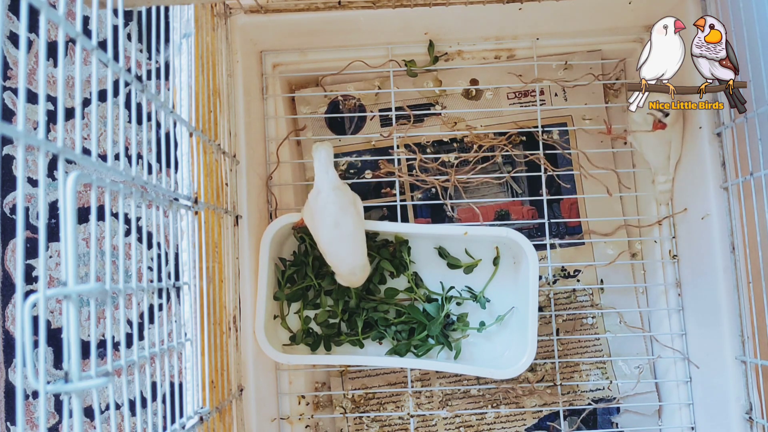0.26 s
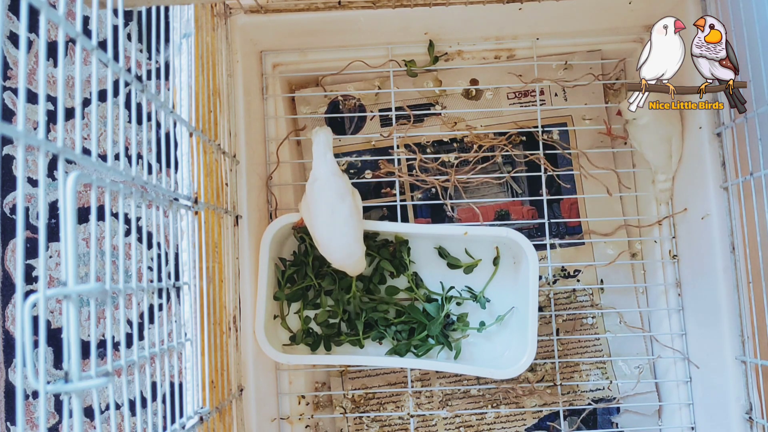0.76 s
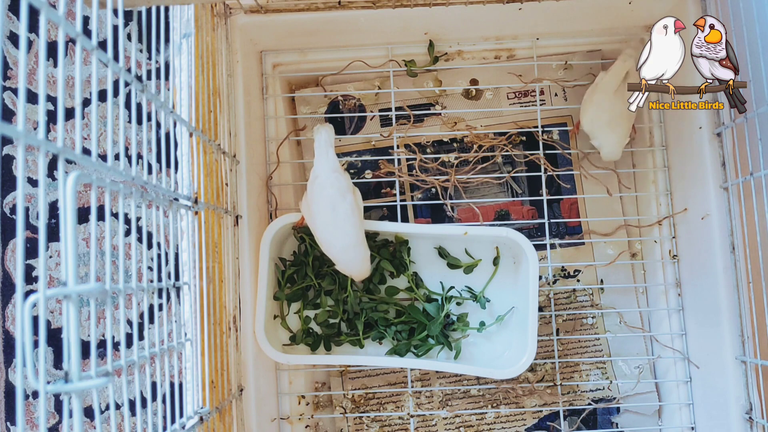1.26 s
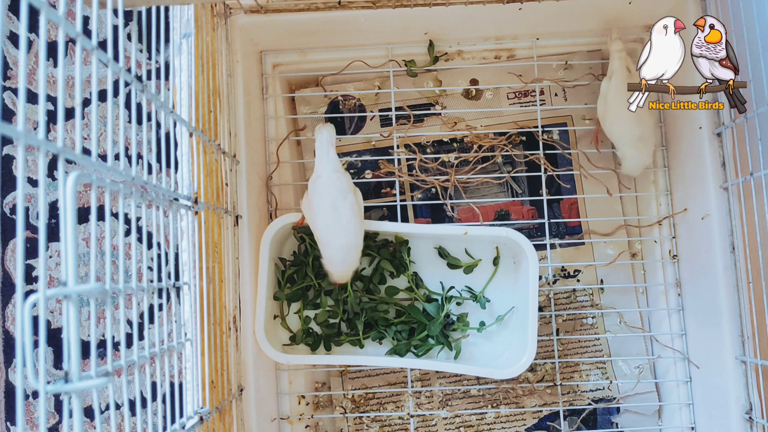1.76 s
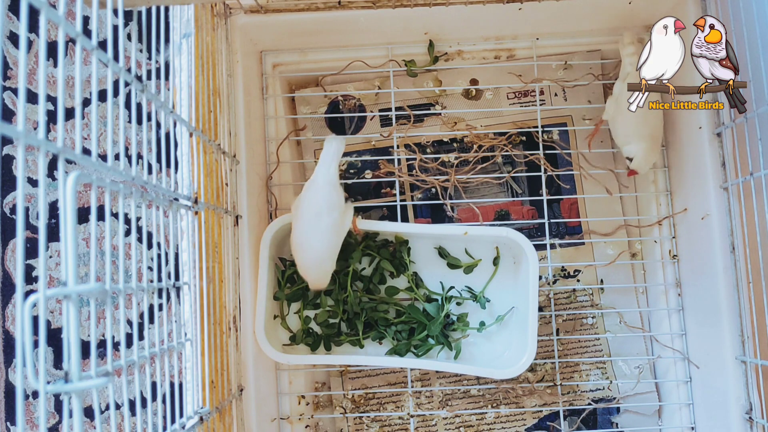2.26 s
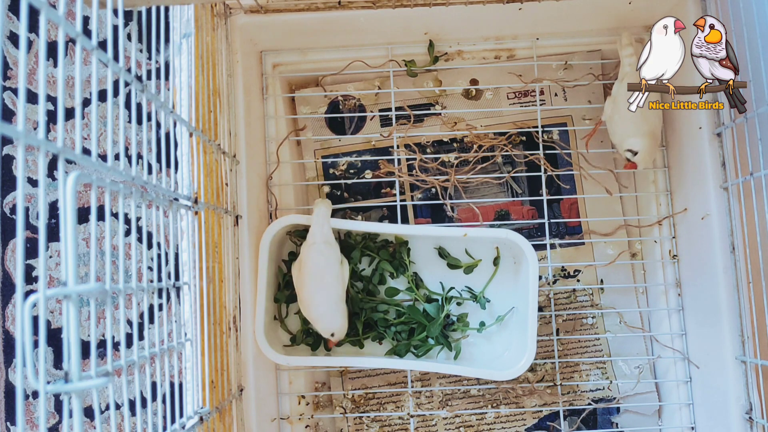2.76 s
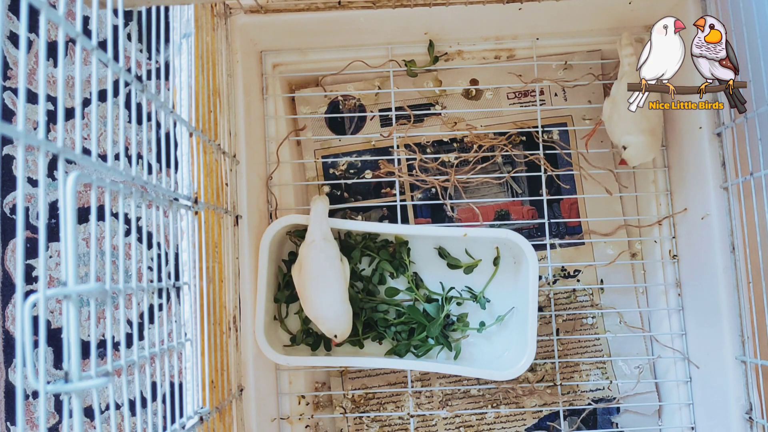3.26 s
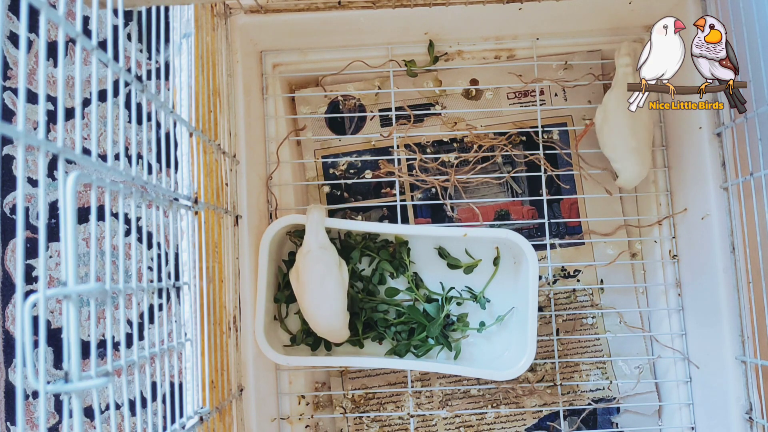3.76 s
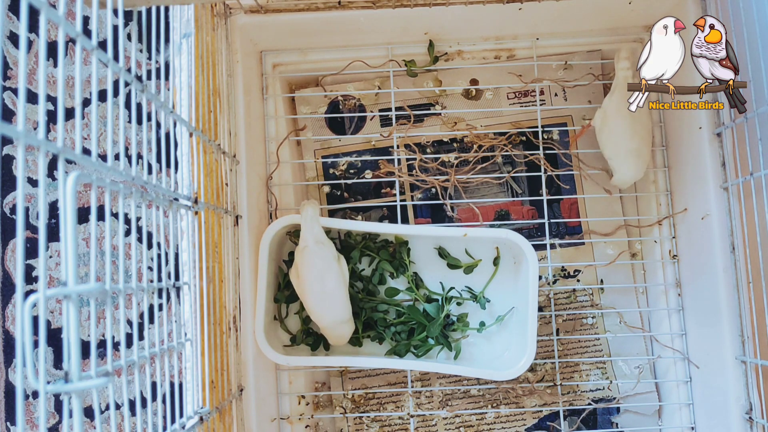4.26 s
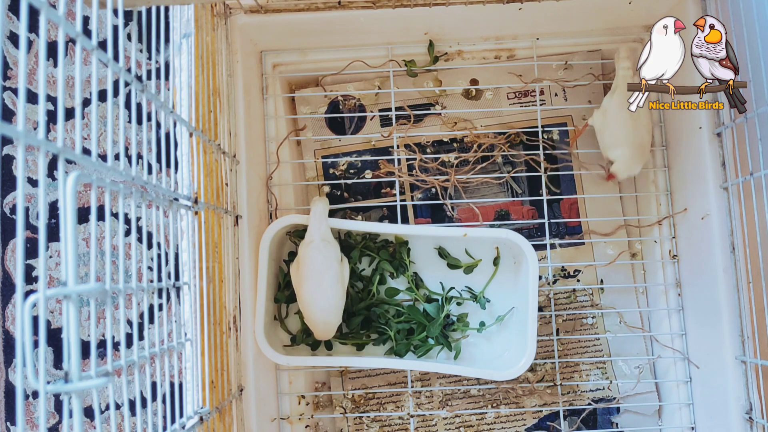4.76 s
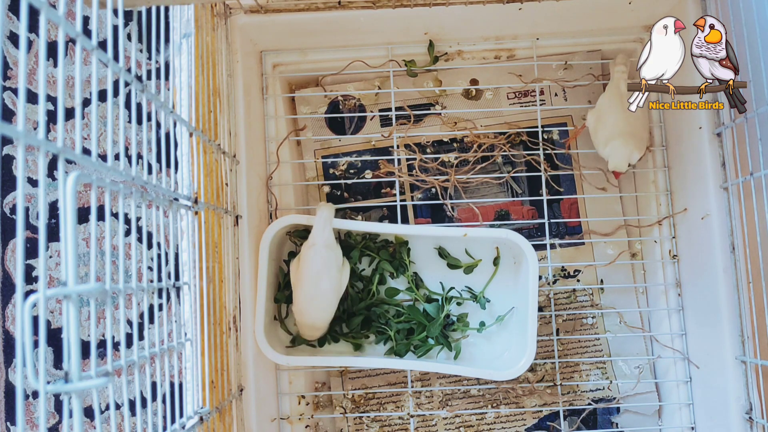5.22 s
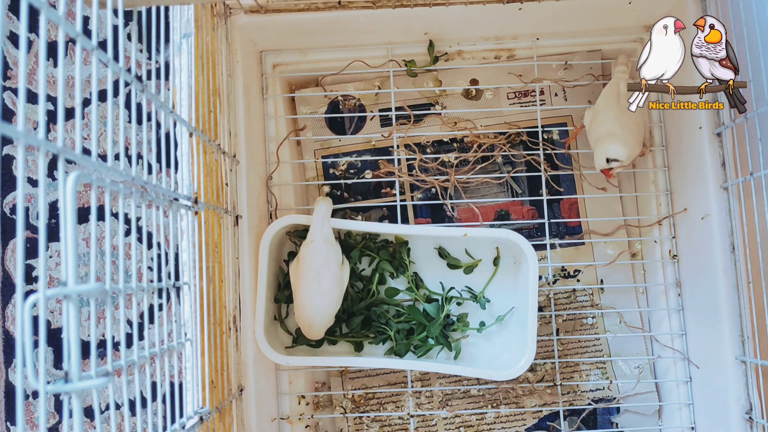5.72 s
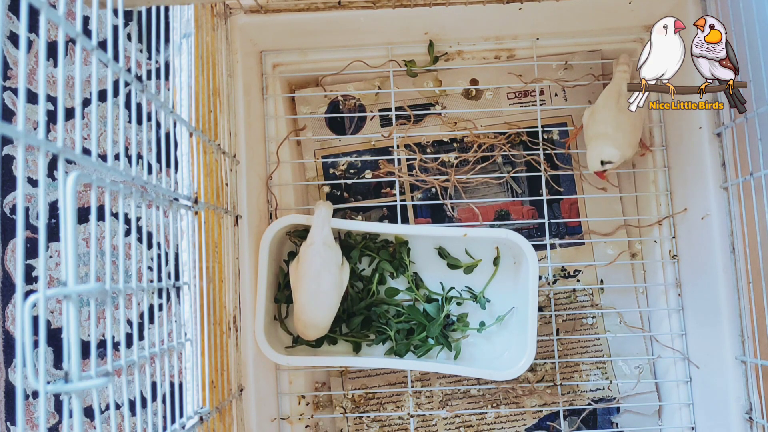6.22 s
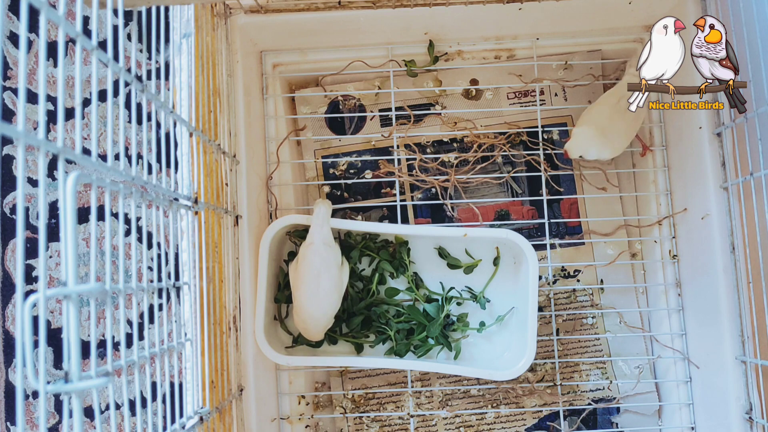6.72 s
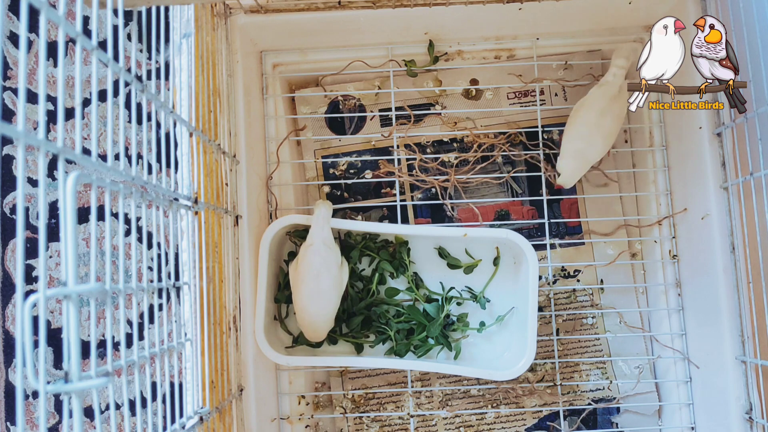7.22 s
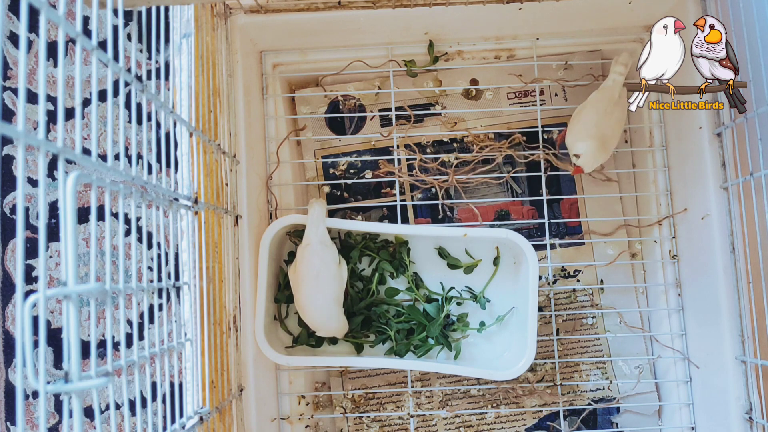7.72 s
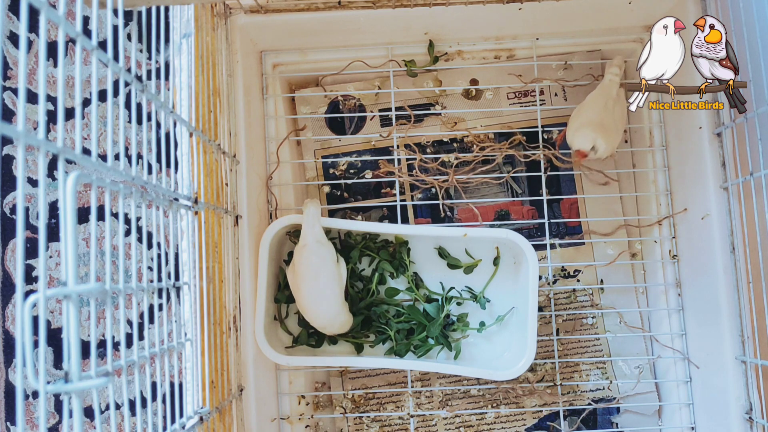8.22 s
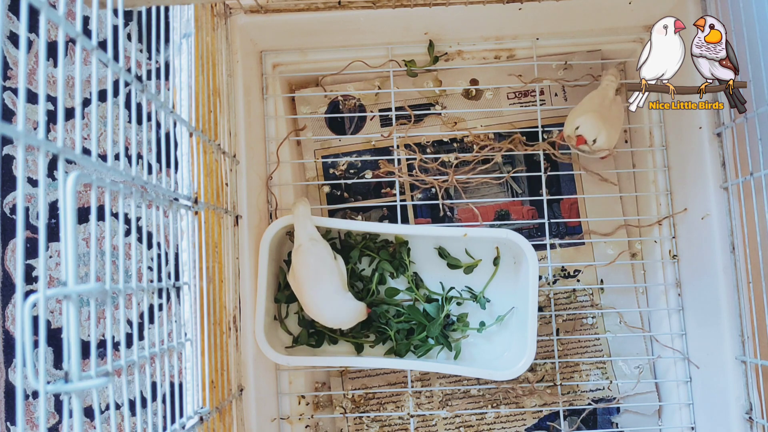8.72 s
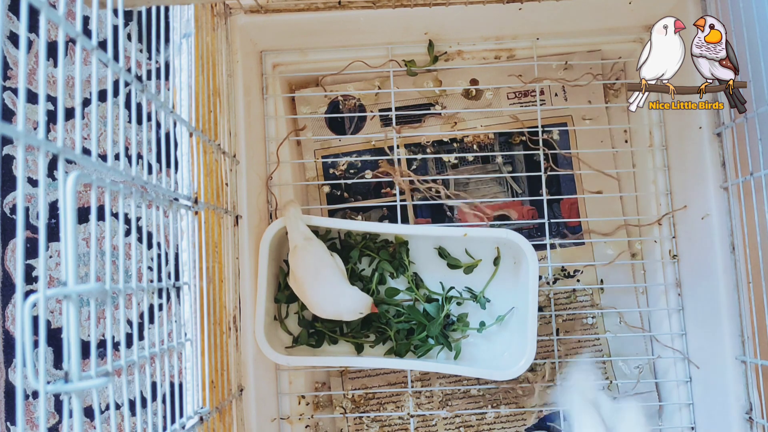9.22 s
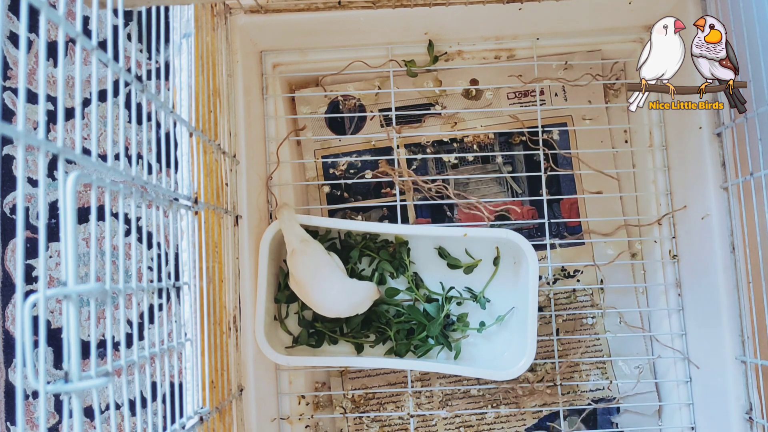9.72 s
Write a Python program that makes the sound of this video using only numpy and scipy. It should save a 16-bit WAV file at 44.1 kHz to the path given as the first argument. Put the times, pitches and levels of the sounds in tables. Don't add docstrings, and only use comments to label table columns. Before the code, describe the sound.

Finches heard close in an indoor wire cage: short buzzy song and paired thin whistles, a soft flutter, then sparse feet, beak knocks on plastic, light claw scrapes and humming wires. Bright piercing chirps cut through in a pair, later a trio. In the last two seconds quick buzzes, whistles and nasal toots overlap with strong wing puffs and snapping bars. Faint hiss and rumble, short reverberation, image leaning left.

```python
import sys
import numpy as np
from scipy import signal
from scipy.fft import rfft, irfft
from scipy.io import wavfile
from scipy.ndimage import uniform_filter1d

SR = 44100
rng = np.random.default_rng(int(sys.argv[2]) if len(sys.argv) > 2 else 0)


def gain_from_db(level_db):
    decades = np.asarray(level_db, float) / 20
    return 10 ** decades


def bounce(signal):
    frames = np.transpose(np.atleast_2d(signal))
    limited = np.clip(frames, -1, 1)
    pcm = np.round(limited * 32767).astype(np.int16)
    wavfile.write(sys.argv[1], SR, pcm)


N = 440109

# (frequency [Hz], density [dB per Hz])
AIR = [(12, -36), (20, 5.5), (32, -6), (146, -16.5), (172, -13.5), (198, -22.5), (319, -13.5), (367, -15),
       (558, -16.5), (642, -20), (718, -18.5), (1190, -26.5), (1530, -29), (9140, -39), (16000, -32)]
AIR_DB = -48.5
# (frequency [Hz], rms level [dB])
HUM = [(100, -61), (145, -62.5), (199, -61.5)]
# (frequency [Hz], left-right likeness [-1 to 1])
LIKENESS = [(60, -0.085), (240, 0.93), (950, -0.032), (3770, 0.15), (15000, -1.2)]
# (frequency [Hz], t60 [s])
ROOM_T60 = [(200, 1), (1500, 0.61), (4000, 0.34), (6500, 0.33), (8700, 0.34), (11000, 0.24), (15000, 0.085)]
# (delay [s], level [dB], sign always positive)
WALLS = [(.0031, 6.5), (.0058, -6.5), (.0094, -13.5), (0.014, 4), (0.022, -23)]
# (frequency [Hz], level [dB])
PORTS = [(60, 6), (180, 8), (550, 5), (1650, 6.5), (4970, 6), (15000, 11)]
# (frequency [Hz], gain [dB])
MICROPHONE = [(20, 5), (7000, 1.5), (8700, 3), (10300, -6), (12000, -4), (15000, -0.5)]
EDGE_HZ = 15850

# (time [s], effort [dB], pitch [Hz], roughness [0-1])
OPEN_BUZZES = [
    (-.06, -31.5, 1092, 0.84),
    (.739, -33, 1080, 0.3),
    (8.436, -32.5, 1080, 0.3),
    (9.403, -32.5, 1078, 0.3),
]
DRAWLS = [
    (0.207, -43, 900, 1.1),
    (1.078, -44.5, 900, 0.83),
    (8.734, -45, 900, 1.1),
    (9.689, -45, 900, 1.2),
]
SLIDES = [
    (0.349, -39.5, 1360, 0.16),
    (8.865, -38.5, 1296, 0.67),
]
BUZZES = [
    (0.568, -34, 1186, 1),
    (8.233, -33, 1133, 0.6),
    (9.084, -40.5, 1166, 0.47),
]
MUTTERS = [
    (5.04, -46, 581, 1),
    (7.858, -48, 848, 1),
]
OPEN_BUZZ, DRAWL, SLIDE = (0.047, 0.048), (0.027, 0.16), (0.0035, 0.03)
BUZZ, MUTTER = (0.038, 0.058), (0.021, 0.025)
# (frequency [Hz], gain [dB])
BUZZ_THROAT = [(500, -17.5), (1100, -8.5), (2200, -6.5), (3400, 1), (4500, 0.5), (5700, -2.5),
               (7200, -11.5), (8800, -13), (11000, -23), (15500, -23)]
# (frequency [Hz], gain [dB])
OPEN_THROAT = [(500, -8), (1100, -14), (2150, -5.5), (3250, -3.5), (4300, -1.5), (5400, 0.5), (7200, -15.5),
               (8700, -11.5), (11000, -20), (15500, -21)]
BUZZ_SWELL_DB, BUZZ_SWELL_S = -7, 0.011
BUZZ_SINK_DB, LOW_SINK_DB = -7.5, -9

# (time [s], peak level [dB], pitch [Hz], length [s])
WHISTLES = [
    (0.103, -33, 4010, 0.03),
    (0.165, -26.5, 5260, 0.023),
    (0.972, -33, 4034, 0.035),
    (1.036, -24.5, 5210, 0.023),
    (8.617, -29.5, 4080, 0.011),
    (8.676, -22, 5113, 0.014),
    (9.582, -31, 3976, 0.024),
    (9.649, -21.5, 5138, 0.015),
]
FLICK_FROM_HZ, FLICK_SHARE, FLICK_BEND = 3600, 1, 2.4

# (time [s], effort [dB], top pitch [Hz], length [s], tilt as the beak opens [dB per octave])
STACKS = [
    (0.444, -51.5, 521, 0.086, 3),
    (8.076, -46, 633, 0.1, 0),
    (8.649, -45.5, 615.4, 0.084, -3.5),
    (8.959, -50.5, 512.4, 0.097, 1),
    (9.051, -46, 590, 0.031, -3.5),
    (9.279, -44.5, 624, 0.092, 1.1),
    (9.569, -47, 546, 0.037, -5),
]
# (frequency [Hz], gain [dB])
STACK_THROAT = [(550, -20.5), (1200, -2), (1800, -2), (2500, 0.5), (4300, 1.5), (5600, -7), (7000, -14),
                (8800, -12.5), (10000, -26), (12000, -23)]
STACK_SAG, SAG_PER_DB = 0.088, -0.028
BREATH, BREATH_PER_DB = 0.29, 0.4

# (time [s], length [s], rustle [dB], thrown air [dB], body of the beat [dB])
WINGS = [(1.105, 0.24, -47.5, -47.5, -46), (1.172, 0.31, -54.5, -46.5, -46), (1.46, 0.28, -73, -47, -55),
         (5.039, 0.029, -43.5, -53, -66), (7.08, 0.055, -48, -70.5, -52), (7.204, 0.16, -64.5, -71, -51.5),
         (9.07, 0.12, -40, -54, -44), (9.115, 0.21, -54, -36, -45), (9.261, 0.062, -48, -59, -47.5),
         (9.694, 0.32, -54, -44.5, -58), (9.829, 0.1, -47, -47, -44.5), (9.892, 0.102, -68, -35, -44.5)]
# (frequency [Hz], density [dB per Hz])
FEATHER = [(590, -51), (1000, -4.5), (2360, -7), (2560, -5), (3270, -6), (5020, -3.5), (5440, -1),
           (10800, -18), (16000, -21)]
SPREAD, FOLD_DB = 0.1, -25.5
BEATS_PER_S, BEAT_DB = 22, 1

# (time [s], peak level [dB], ring [Hz], brightness [dB])
THUDS = [(1.143, -39, 780, -5), (1.808, -49, 1050, 12), (1.81, -40.5, 524, -20), (1.898, -41.5, 1070, 11),
         (2.053, -41, 900, -23), (3.694, -41.5, 1410, -28), (4.74, -40.5, 783, -20),
         (6.946, -43.5, 960, 17), (7.079, -34, 840, -9), (7.223, -52.5, 720, -20), (7.283, -53.5, 815, -10),
         (7.86, -48, 1003, -21)]
THUD_SHARP, THUD_T60_S = 0.32, 0.095
# (time [s], peak level [dB], ring [Hz], brightness [dB], sharpness [0-1])
KNOCKS = [(2.41, -29, 1075, -42, 0.7), (2.423, -37, 1150, -31.5, 0.7), (2.427, -33, 1180, -24, 0.33),
          (2.439, -33, 710, -26.5, 0.33), (2.606, -39, 920, -48, 0.84), (2.613, -33, 1076, -39, 0.7),
          (2.617, -35, 1150, -25, 0.6), (4.246, -52, 1123, -21.5, 0.6), (4.394, -47.5, 900, -27, 0.44),
          (4.432, -50, 1030, -25, 0.5), (5.226, -48.5, 1550, -16, 0.14), (5.273, -58, 825, -14, 1),
          (5.299, -44, 824, -30.5, 0.27), (9.866, -38, 1580, -15, 0.73), (9.879, -26.5, 710, -11, 0.15)]
KNOCK_T60_S = 0.031

# (time [s], peak level [dB], ring [Hz], top ring [dB])
TICKS = [(1.471, -61, 5380, 13), (1.624, -47.5, 3160, -4), (1.898, -41, 4120, -49), (2.438, -43, 2280, -31),
         (2.6917, -34.5, 2960, -21), (2.728, -48.5, 2760, 4.5), (2.855, -45.5, 3070, -29),
         (3.821, -39, 2850, -8), (3.9969, -38, 3070, -6), (4.3792, -64, 2760, 9), (4.741, -40, 3720, -24),
         (4.8418, -56, 2400, -4), (5.1632, -58, 3340, 16.5), (5.3191, -58, 2260, 8.5),
         (5.369, -59, 2560, 14.5), (5.9304, -58, 3660, 9.5), (6.1646, -36, 2900, -20),
         (6.399, -58, 5260, -21), (6.4825, -42.5, 3050, -15), (7.337, -34, 2860, -11.5),
         (7.3834, -42.5, 3200, -5), (7.529, -53.5, 2450, -10.5), (7.564, -37, 2620, -2),
         (7.6412, -63, 2350, -9.5)]
# (time [s], peak level [dB], ring [Hz], top ring [dB])
SCRAPES = [
    (2.1603, -40.5, 2300, -22),
    (5.012, -36, 3050, -12),
    (7.85, -38.5, 2910, -5.5),
]
# (time [s], peak level [dB], ring [Hz], top ring [dB])
SNAPS = [
    (9.0676, -27, 5060, 3),
    (9.155, -32, 3340, -1),
    (9.218, -27.5, 3300, -6),
    (9.868, -25, 2290, 13),
    (9.882, -28, 5100, 0),
]
TICK_T60_S, SCRAPE_T60_S, SNAP_T60_S = 0.038, 0.19, 0.007
# (time [s], level [dB], frequency [Hz], t60 [s])
WIRES = [(3.699, -48, 1800, 0.27), (3.698, -46, 1547, 0.15), (3.7, -48, 1660, .2), (3.7, -52, 500, 0.24),
         (4.746, -48, 554, 0.22), (4.751, -47, 345, 0.1), (4.744, -50, 1330, 0.2), (4.752, -48, 1060, 0.08),
         (7.079, -38, 1313, 0.12), (7.389, -55, 3220, 0.2), (9.086, -37, 2045, 0.6), (1.9, -54, 1880, .35),
         (1.899, -52, 4350, .08), (2.172, -51, 1850, .06), (5.3, -54, 1600, .15)]

# (time [s], peak effort [dB], length [s], upper voice knee [Hz], lower voice top [Hz])
CHIRPS = [
    (3.137, -18.5, 0.081, 5130, 4080),
    (3.285, -12.5, 0.056, 5287, 4060),
    (6.696, -16.5, 0.078, 4966, 4100),
    (6.827, -14, 0.069, 5034, 4094),
    (6.96, -15, 0.075, 4723, 3956),
]
# (multiples of upper and lower voice, level [dB])
MIXES = [
    ("1 0", 0),
    ("0 1", -13.5),
    ("0 2", -25),
    ("2 -1", -25),
    ("1 1", -30.5),
    ("2 0", -15),
    ("1 -1", -52),
]
# (frequency [Hz], gain [dB])
CHIRP_BEAK = [(2500, -4), (3200, 0), (3450, -1.5), (3750, -2), (4400, -6), (5200, -7), (5700, -1.5),
              (6600, 3), (7600, 0), (9500, -1.5), (12000, 0)]
SCOOP_HZ, SCOOP_S, CLIMB_HZ_PER_S = 1417, 0.0085, 20000
LOW_START, LOW_SCOOP_HZ, LOW_SAG, LOW_FADE_DB = 0.73, 346, 0.035, -15.5
TURN, CATCH_AT = 0.81, 0.87
SWELL_DB, SWELL_S, CATCH_DB, CATCH_S, CLOSE_DB = -26.5, 0.021, -14, 0.006, -3.5


def evened(x):
    return x / np.sqrt(np.mean(x ** 2) + 1e-20)


def read(points, hz):
    f, value = np.transpose(points)
    return np.interp(np.log(hz + 1), np.log(f + 1), value)


def add(mix, s, sound):
    at = round(s * SR)
    part = mix[max(at, 0):][:len(sound) + min(at, 0)]
    part += sound[max(-at, 0):][:len(part)]


def chance(size):
    return rng.standard_normal(max(size, 30000))[:size]


def wobble(size, hz):
    width = int(SR / hz)
    return evened(uniform_filter1d(uniform_filter1d(chance(size), width), width))


def coloured(x, points):
    hz = np.fft.rfftfreq(x.shape[-1], 1 / SR)
    return irfft(rfft(x) * gain_from_db(read(points, hz)), x.shape[-1])


def ring(hz, width_hz, noise):
    r = np.exp(-np.pi * width_hz / SR)
    poles = [1, -2 * r * np.cos(2 * np.pi * hz / SR), r * r]
    return evened(signal.lfilter([1, 0, -1], poles, noise))


def harmonics(hz, throat, uneven_db, count):
    turns = np.cumsum(hz) / SR
    k = np.arange(1, count)[:, None]
    gain_db = read(throat, k * hz) + uneven_db * rng.standard_normal(k.shape)
    gain = gain_from_db(gain_db) * (k * hz < EDGE_HZ)
    phase = k * turns + rng.random(k.shape)
    return evened((gain * np.cos(2 * np.pi * phase)).sum(0))


def air():
    frames, hz = N // 512 + 5, np.fft.rfftfreq(2048, 1 / SR)
    a, b, c, d, patches = rng.standard_normal((frames, 1025, 5)).T
    patches = evened(uniform_filter1d(uniform_filter1d(patches, 30, 0), 8, 1))
    same = np.clip(read(LIKENESS, hz), -1, 1)[:, None]
    left = a + 1j * b
    right = same * left + np.sqrt(1 - same ** 2) * (c + 1j * d)
    z = np.array([left, right]) * gain_from_db(read(AIR, hz)[:, None] + 0.86 * patches)
    hiss = gain_from_db(AIR_DB) * evened(signal.istft(z, nperseg=2048, noverlap=1536)[1][:, :N])
    return hiss + sum(gain_from_db(db) * ring(f, 7.4, rng.standard_normal(N)) for f, db in HUM)


def room():
    taps = np.zeros((2, SR))
    slots = np.arange(300, SR - 20, 12)
    at = slots + rng.integers(0, 12, (2, len(slots)))
    np.put_along_axis(taps, at, rng.choice([-1., 1.], at.shape), 1)
    hz, t, z = signal.stft(taps, SR, nperseg=256)
    decay = gain_from_db(-60 * t / read(ROOM_T60, hz)[:, None])
    tail = signal.istft(z * decay, SR, nperseg=256)[1]
    tail = gain_from_db(8.0) * tail / np.linalg.norm(tail[0])
    for s, db in WALLS:
        tail[[0, 1], round(s * SR) + rng.integers(0, 30, 2)] += gain_from_db(db)
    return tail


def buzz(s, effort_db, hz, hold_s, fall_s, rough, throat):
    t = np.arange(0, hold_s + fall_s, 1 / SR)
    down = np.clip((t - hold_s) / fall_s, 0, 1)
    start = np.exp(-(t / BUZZ_SWELL_S) ** 2)
    pitch = hz * (1 - 0.0926 * np.exp(-t / 0.00613)) * (1 - 0.5 * down ** 0.8)
    pitch = pitch * (1 + (0.0099 + 0.0063 * rough * down) * wobble(len(t), hz=493))
    breath = evened(coloured(chance(len(t)), throat))
    share = np.clip(rough * (0.35 + 0.5 * down + start), 0, 1)
    voice = (1 - share) * harmonics(pitch, throat, uneven_db=-0.5, count=28) + share * breath
    low = coloured(voice, [(2500, 0), (3100, -40)])
    voice = voice - low * (1 - gain_from_db(LOW_SINK_DB * np.minimum(4 * down, 1)))
    effort = gain_from_db(effort_db + BUZZ_SINK_DB * down + BUZZ_SWELL_DB * start)
    return s, effort * voice * (1 - np.exp(-t / 0.00045)) * signal.windows.tukey(len(t), 0.12)


def whistle(s, db, hz, length_s):
    t = np.arange(0, length_s, 1 / SR)
    closing = (t / length_s) ** FLICK_BEND
    pitch = hz * (1 + 0.078 * np.exp(-t / 0.0034)) + FLICK_SHARE * (hz - FLICK_FROM_HZ) * closing
    phase = 2 * np.pi * np.cumsum(pitch) / SR
    breath = evened(coloured(chance(len(t)), BUZZ_THROAT))
    tone = gain_from_db(-22 * closing) * (np.sin(phase) + 0.041 * np.sin(2 * phase)) + 0.045 * breath
    return s, gain_from_db(db) * tone * signal.windows.tukey(len(t), 0.2)


def stack(s, effort_db, hz, length_s, tilt_db):
    t = np.arange(0, length_s, 1 / SR)
    throat = [(f, db + tilt_db * np.log2(f / 2000)) for f, db in STACK_THROAT]
    sag = (STACK_SAG + SAG_PER_DB * tilt_db) * (t / length_s) ** 3.65
    pitch = hz * (1 - 0.0963 * np.exp(-t / 0.01625) - sag)
    pitch = pitch * (1 + 0.0065 * wobble(len(t), hz=302))
    voice = harmonics(pitch, throat, uneven_db=1.5, count=20)
    breath = evened(coloured(chance(len(t)), throat))
    voice = voice + max(BREATH + BREATH_PER_DB * tilt_db, 0) * breath
    return s, gain_from_db(effort_db) * voice * signal.windows.tukey(len(t), 0.45)


def wings():
    rustle, gust = np.zeros(N), np.zeros((2, N))
    for s, length_s, rustle_db, air_db, body_db in WINGS:
        t = np.arange(0, length_s, 1 / SR)
        u, size = t / length_s, len(t)
        fade = np.minimum(u / SPREAD, 1) * np.minimum((1 - u) / 0.095, 1)
        fade = fade * gain_from_db(FOLD_DB * np.maximum(u - SPREAD, 0) ** 2)
        fade = fade * gain_from_db(-BEAT_DB * np.cos(2 * np.pi * BEATS_PER_S * t))
        noise = [chance(size) for _ in range(4)]
        grains = evened(coloured(noise[0] * gain_from_db(7.9 * wobble(size, hz=412)), FEATHER))
        beat = evened(coloured(noise[1], [(60, -14.0), (200, -6.5), (900, -9.0), (2500, -48.0)]))
        add(rustle, s, fade * (gain_from_db(rustle_db + 5.0) * grains + gain_from_db(body_db - 4.0) * beat))
        for port in range(2):
            puff = noise[1] + 0.66 * noise[2 + port]
            puff = evened(coloured(puff, [(8, -4.0), (25, -15.0), (90, -14.0), (300, -37.0)]))
            add(gust[port], s, fade * gain_from_db(air_db) * puff)
    return rustle, gust


def knock(s, db, hz, bright_db, sharp, t60_s):
    t, noise = np.arange(6000) / SR, rng.standard_normal(6000)
    blow = np.sin(2 * np.pi * 1.1 * hz * t) * np.exp(-((t - 0.002) / 0.001) ** 2)
    body = 0.32 * ring(hz, 574, noise) + 0.18 * ring(950, 1355, noise)
    body = body * gain_from_db(-60 * t / t60_s) * (1 - np.exp(-t / 0.0033))
    crack = gain_from_db(bright_db - 21.5) * ring(3200, 2700, noise[::-1]) * gain_from_db(-60 * t / 0.031)
    return s, gain_from_db(db + 9.5) * (sharp * blow + (1.05 - sharp) * body + crack)


def tick(s, db, hz, top_db, t60_s):
    t, noise = np.arange(5000) / SR, rng.standard_normal(5000)
    rings = ring(hz, 700, noise) + 0.328 * ring(4500, 3900, noise)
    rings = rings + gain_from_db(top_db + 5.0) * ring(7180, 3170, noise[::-1])
    slips = gain_from_db(db - 5 - 60 * t / t60_s + 3 * wobble(5000, hz=400))
    return s, slips * rings * (1 - np.exp(-t / (0.04 * t60_s)))


def twang(s, db, hz, t60_s):
    t = np.arange(SR // 2) / SR
    level = gain_from_db(db - 60 * t / t60_s + 5 * wobble(len(t), hz=80))
    return s, level * np.sin(2 * np.pi * hz * t) * (1 - np.exp(-t / 0.003))


def chirp(s, peak_db, length_s, knee_hz, top_hz):
    t = np.arange(0, length_s, 1 / SR)
    u = t / length_s
    before = np.minimum(u / TURN - 1, 0)
    after = np.maximum(u / TURN - 1, 0) / (1 - TURN)
    upper_hz = knee_hz + CLIMB_HZ_PER_S * t - SCOOP_HZ * np.exp(-t / SCOOP_S)
    lower_hz = top_hz * (1 + (1 - LOW_START) * before - LOW_SAG * after)
    lower_hz = lower_hz - LOW_SCOOP_HZ * np.exp(-t / SCOOP_S)
    pitches = np.array([upper_hz, lower_hz])
    phases = []
    for pitch in pitches:
        unsteady = uniform_filter1d(pitch, 120) * (1 + 0.00063 * wobble(len(t), hz=900))
        phases.append(2 * np.pi * np.cumsum(unsteady) / SR)

    catch = np.exp(-((t - CATCH_AT * length_s) / CATCH_S) ** 2)
    effort_db = peak_db + SWELL_DB * np.exp(-t / SWELL_S) + CATCH_DB * catch + CLOSE_DB * u ** 12
    weak_db = -0.12 * (effort_db + 14)
    coupling_db = -np.clip(t - length_s + 0.025, 0, 1) * 2500
    tone = 0
    for multiples, db in MIXES:
        k = np.array(multiples.split(), float)
        level_db = db + read(CHIRP_BEAK, abs(k @ pitches)) + 0.47 * wobble(len(t), hz=150)
        if k[0] == 0:
            level_db = level_db + LOW_FADE_DB * after
        if abs(k).sum() > 1:
            level_db = level_db + weak_db + coupling_db
        tone = tone + gain_from_db(level_db) * np.cos(k @ phases)
    breath = coloured(chance(len(t)), [(1500, -24.0), (3000, -7.5), (6500, -15.0), (9000, -4), (16000, -8.0)])
    voice = tone + gain_from_db(2.9 * weak_db - 26.5) * evened(breath)
    return s, gain_from_db(effort_db) * voice * signal.windows.tukey(len(t), 0.14)


def scene():
    floor, echoes = air(), room()
    rustle, gust = wings()
    singer, beamed, near, mate, tray = np.zeros((5, N))
    cage = rustle.copy()
    for table, timing, throat in ((OPEN_BUZZES, OPEN_BUZZ, OPEN_THROAT), (DRAWLS, DRAWL, BUZZ_THROAT),
                                  (SLIDES, SLIDE, BUZZ_THROAT), (BUZZES, BUZZ, BUZZ_THROAT),
                                  (MUTTERS, MUTTER, BUZZ_THROAT)):
        for s, db, hz, rough in table:
            add(singer, *buzz(s, db, hz, *timing, rough, throat))
    for make, table, shared, mix in ((whistle, WHISTLES, (), beamed), (stack, STACKS, (), mate),
                                     (knock, THUDS, (THUD_SHARP, THUD_T60_S), cage),
                                     (knock, KNOCKS, (KNOCK_T60_S,), tray),
                                     (tick, TICKS, (TICK_T60_S,), cage),
                                     (tick, SCRAPES, (SCRAPE_T60_S,), cage),
                                     (tick, SNAPS, (SNAP_T60_S,), cage),
                                     (twang, WIRES, (), cage), (chirp, CHIRPS, (), near)):
        for row in table:
            add(mix, *make(*row, *shared))
    aside = gain_from_db(6.0) * singer + gain_from_db(7) * mate + cage + gain_from_db(1.5) * tray
    aside = np.array([aside, np.roll(aside, shift=4)])
    ahead = gain_from_db(3.0) * beamed + gain_from_db(4) * near
    wet = gain_from_db(-3.0) * singer + gain_from_db(-1.5) * beamed + gain_from_db(-3) * near
    wet = wet + gain_from_db(-8) * mate + gain_from_db(-9.5) * cage + gain_from_db(-18.0) * tray
    reverb = signal.fftconvolve(wet[None], echoes, axes=1)[:, :N]
    return aside + ahead + reverb + gust + floor


def top_cut(x):
    return signal.sosfilt(signal.butter(12, 16500, fs=SR, output="sos"), x)


def record(dry):
    right = coloured(dry[1], [(f, -db) for f, db in PORTS])
    ports = coloured(np.array([dry[0], right]), MICROPHONE)
    low_pass = signal.firwin(801, EDGE_HZ, window="blackman", fs=SR)
    ports = signal.oaconvolve(ports, low_pass[None], "same")
    return top_cut(ports)


dry = scene()
out = record(dry)
bounce(out)
```